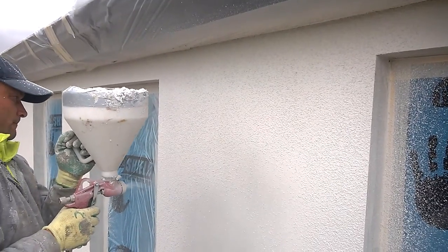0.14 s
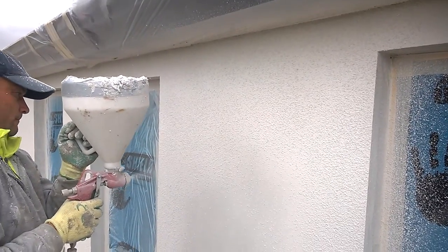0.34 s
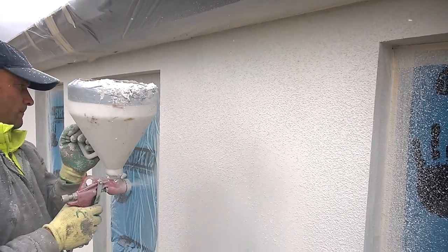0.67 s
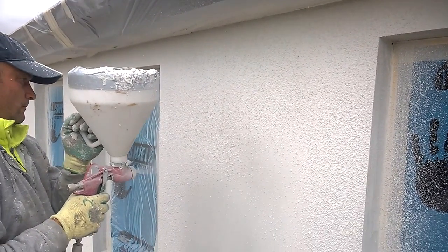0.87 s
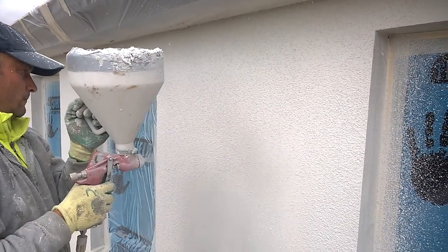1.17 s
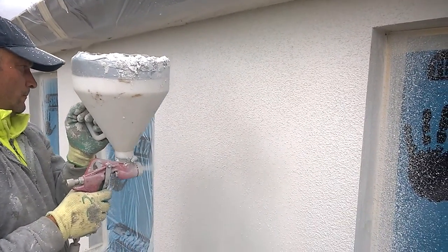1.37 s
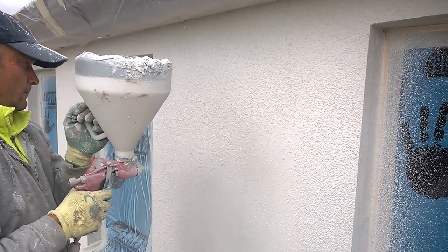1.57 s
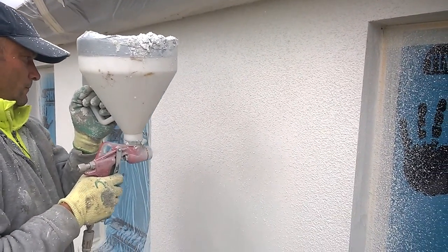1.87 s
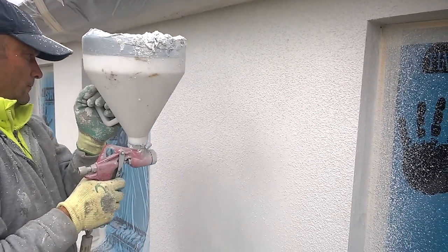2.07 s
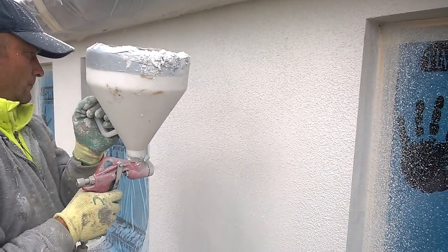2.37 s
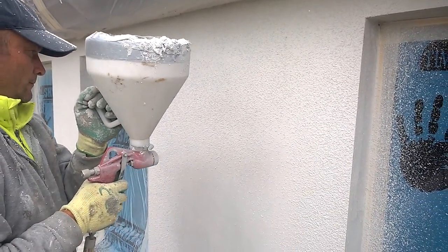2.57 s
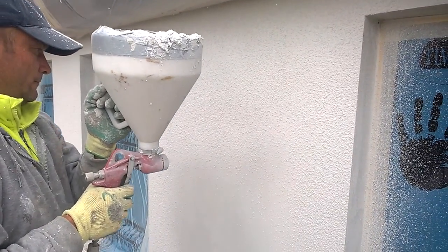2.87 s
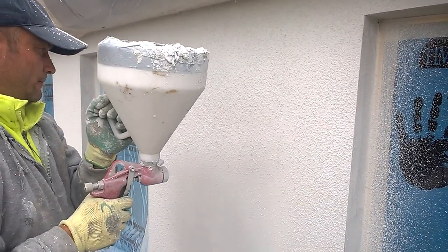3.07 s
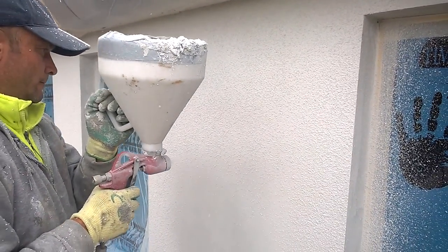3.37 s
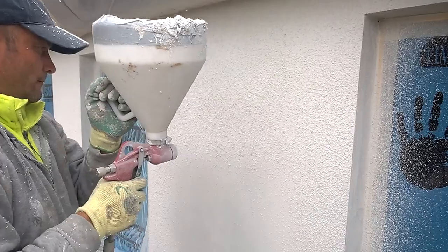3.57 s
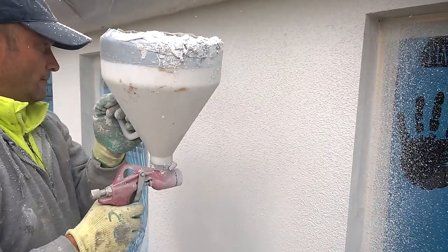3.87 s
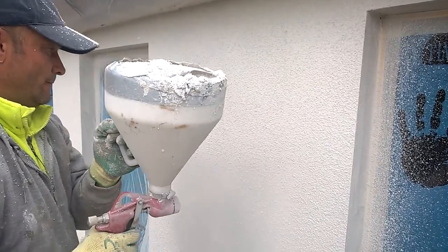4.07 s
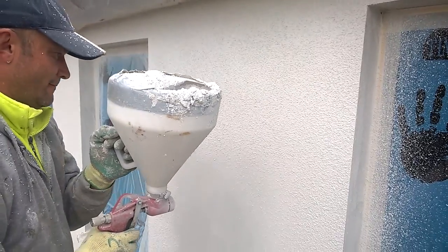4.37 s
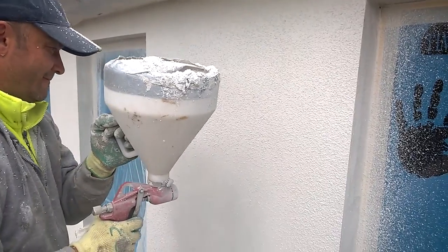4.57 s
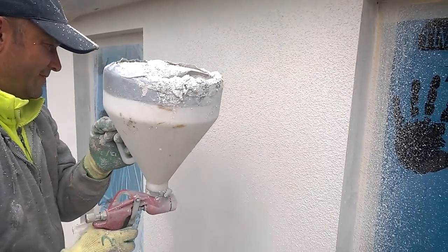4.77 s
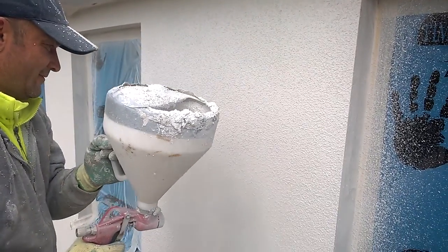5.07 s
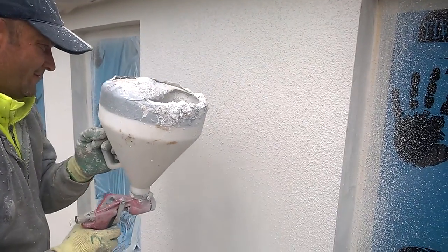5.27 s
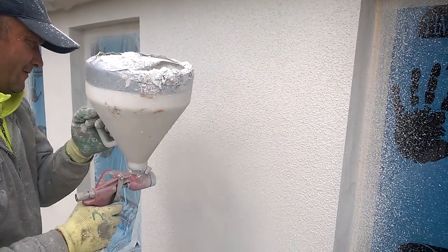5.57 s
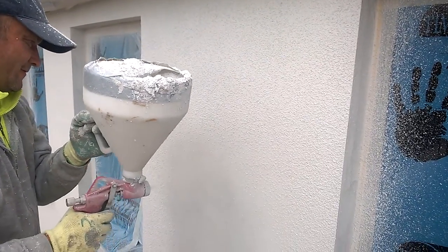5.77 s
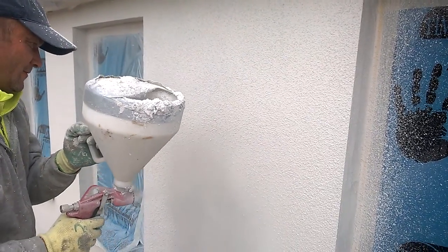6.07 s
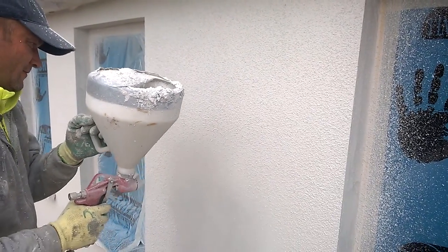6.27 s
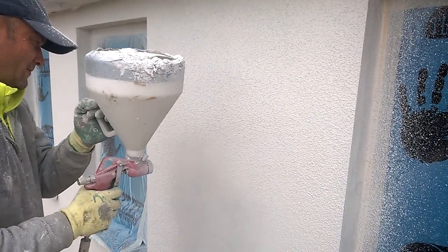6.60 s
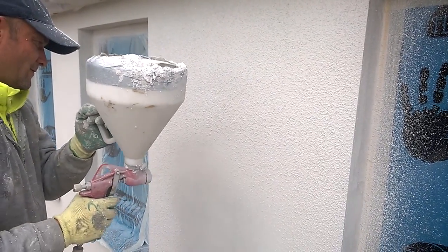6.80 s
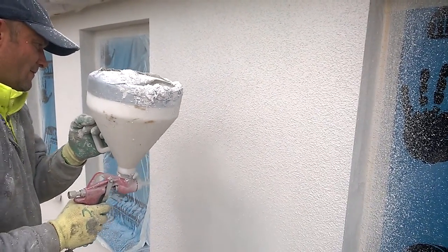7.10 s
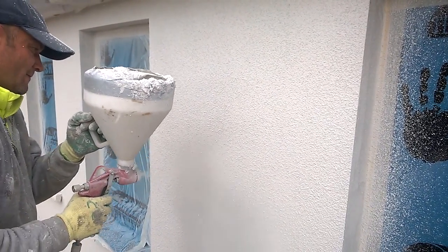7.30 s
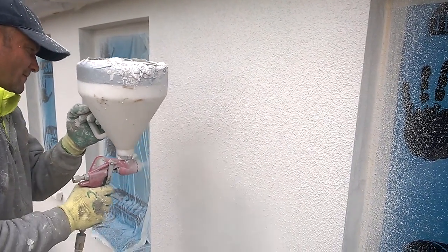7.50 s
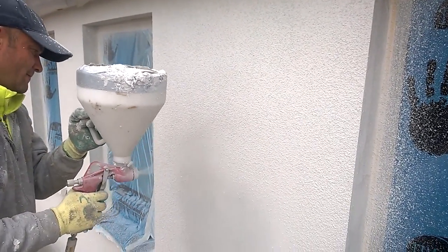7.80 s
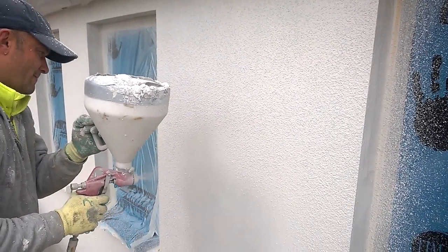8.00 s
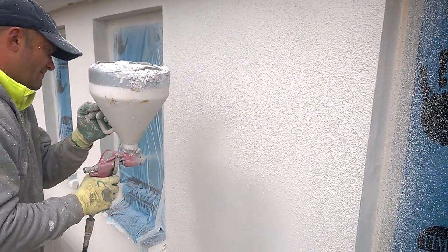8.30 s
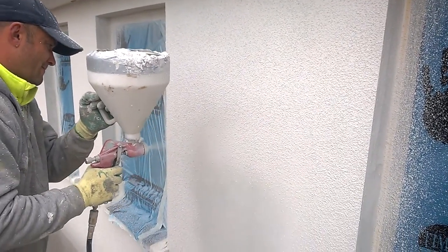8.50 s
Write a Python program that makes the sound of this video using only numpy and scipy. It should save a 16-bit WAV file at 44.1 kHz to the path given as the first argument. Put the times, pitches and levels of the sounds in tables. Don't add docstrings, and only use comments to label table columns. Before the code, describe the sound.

A compressed-air spray gun hisses steadily and sharply at a wall, swaying in circles, while faint wet plaster blobs patter over a low site rumble.

```python
import sys
import numpy as np
from scipy import signal
from scipy.fft import rfft, irfft, next_fast_len
from scipy.io import wavfile
from scipy.ndimage import uniform_filter1d, minimum_filter1d, map_coordinates

SR = 44100
rng = np.random.default_rng(int(sys.argv[2]) if len(sys.argv) > 2 else 0)


def wav_out(sig):
    wavfile.write(sys.argv[1], SR, np.round(np.clip(np.atleast_2d(sig).T, -1, 1) * 32767).astype(np.int16))


def boost(x):
    u = np.asarray(x, float) / 20
    return 10 ** u


N = 381465


def unit(x):
    return x / np.sqrt(np.mean(x ** 2) + 1e-20)


def along(points, hz, index=1):
    rows = np.array(points)
    return np.interp(np.log(hz + 1), np.log(rows[:, 0] + 1), rows[:, index])


def wobble(rate_hz):
    knots = rng.standard_normal(int(N * rate_hz / SR) + 4)
    return map_coordinates(knots, [np.arange(N) * rate_hz / SR])


def blurred(x, size_hz, size_t):
    return uniform_filter1d(uniform_filter1d(x, size=size_hz, axis=0), size=size_t, axis=1)


def filtered(x, response):
    m = next_fast_len(N + 8192)
    return irfft(rfft(x, m) * response(np.fft.rfftfreq(m, 1 / SR)), m)[..., :N]


def delayed(x, late_ms):
    return map_coordinates(x, [np.arange(N) - late_ms * SR / 1000], order=3)


def patchy(patchy_db, gain_db):
    hz, t, z = signal.stft(rng.standard_normal(N), SR, nperseg=1024, noverlap=768)
    streaks = unit(blurred(rng.standard_normal(z.shape), 4, 12))
    z = z * boost(patchy_db * streaks + gain_db(hz, t))
    return signal.istft(z, SR, nperseg=1024, noverlap=768)[1][:N]


# (frequency [Hz], density [dB per Hz])
NOZZLE = [(2120, -47), (3600, -25), (4020, -26.5), (5110, -14), (5530, -15.5), (6370, -3), (7030, 1.5),
          (8870, -5.5), (11800, -1), (13500, -7), (15100, -8), (15600, -19)]


def jet_air():
    flat_hz = 15050
    air = filtered(patchy(1.56, beam_db), lambda hz: boost(along(NOZZLE, np.minimum(hz, flat_hz))))
    slow_db = 0.33 * wobble(9) + 0.086 * wobble(22)
    fast_db = 0.33 * wobble(70) + 0.42 * wobble(160) + 0.8 * wobble(600)
    return unit(air) * boost(slow_db + fast_db)


# (time [s], aim at microphone [dB], lift [dB])
AIM = [(0, -4.5, 0.1), (1.2, -4, -0.2), (1.45, 0, -0.7), (1.72, -3.5, -0.2), (2.2, 0.8, -.6),
       (2.65, 1.3, -.6), (3.05, 5.5, 0.3), (3.45, 1.5, 0.5), (3.78, 4.2, 0.7), (4.05, 1, -0.3),
       (4.5, 5, 1.3), (5.38, 2.2, 0.2), (6.0, 4.5, -0.4), (6.4, -0.5, .1), (6.78, 1.5, -.3), (7.0, 3, -1),
       (7.35, -4, 0.2), (8.65, -5.5, 0.1)]
# (frequency [Hz], share [1])
FOLLOW = [(4000, 1.6), (8000, 0.83), (11800, 0.48), (13300, 0.43), (15500, 0.55)]
# (centre [Hz], half width [Hz], gain per aim [dB/dB])
LOBES = [(4940, 480, 1.1), (10240, 970, .65), (14000, 800, 0.5)]
# (frequency [Hz], share [1])
LIFT = [(6000, -.9), (8500, .1), (11000, .9), (15000, 0.4)]


def beam_db(hz, t):
    s, aim, lift = np.transpose(AIM)
    aim_db, lift_db = np.interp(t, s, aim), np.interp(t, s, lift)
    broad_share = 0.35
    gain_db = along(FOLLOW, hz)[:, None] * broad_share * aim_db
    for centre_hz, half_width_hz, share in LOBES:
        inside = np.exp(-((hz - centre_hz) / half_width_hz) ** 4)[:, None]
        gain_db = gain_db + inside * (share * aim_db - gain_db)
    return gain_db + along(LIFT, hz)[:, None] * lift_db


# (frequency [Hz], echo level [dB], phase [turns])
WALL_COLOUR = [(5000, -30, -.15), (5900, -13, -.1), (6600, -9, 0), (7900, -10, 0), (8600, -17, -.1),
               (9400, -17, -.36), (10700, -22, -.2), (11600, -21, .08), (12700, -17, .03),
               (14100, -18, -.25), (15000, -18, -.4)]


def wall_echo(air):
    def reflection(hz):
        turns = along(WALL_COLOUR, hz, index=2)
        return boost(along(WALL_COLOUR, hz)) * np.exp(2j * np.pi * turns)
    return delayed(filtered(air, reflection), circling_ms())


# (far end [s], delay [ms], near end [s], delay [ms])
CIRCLES = [(-.1, 1.58, .3, 1.465), (.68, 1.56, .98, 1.521), (1.49, 1.623, 1.8, 1.569),
           (2.33, 1.67, 2.62, 1.627), (3.11, 1.73, 3.49, 1.643), (4.05, 1.834, 4.57, 1.669),
           (4.95, 1.768, 5.51, 1.54), (5.92, 1.682, 6.51, 1.476), (6.93, 1.61, 7.51, 1.377),
           (7.9, 1.486, 8.44, 1.301), (8.85, 1.42, 9.4, 1.3)]


def circling_ms():
    s, late_ms = np.reshape(CIRCLES, (-1, 2)).T
    place = np.interp(np.arange(N) / SR, s, np.arange(len(s)))
    end = place.astype(int)
    swing = np.sin(np.pi / 2 * (place - end)) ** 2
    return late_ms[end] + (late_ms[end + 1] - late_ms[end]) * swing


# (delay [ms], drift [ms], level [dB])
BOUNCES = [(.62, .03, -21), (.95, .03, -18), (2.3, .05, -16), (3.4, .06, -15), (4.7, .07, -16)]


def near_bounces(air):
    upper = filtered(air, lambda hz: boost(-3.8) / (1 + (8500 / (hz + 1)) ** 12))
    return sum(boost(db) * delayed(upper, ms + drift_ms * wobble(1.7)) for ms, drift_ms, db in BOUNCES)


def jet():
    air = jet_air()
    return unit(air + wall_echo(air) + near_bounces(air)) * boost(-47.5)


def splats(times_s, level_db, hz, cycles):
    t = np.arange(500) / SR
    age = hz[:, None] * t / cycles
    envelope = np.e * age * np.exp(-age)
    waves = boost(level_db)[:, None] * np.sin(2 * np.pi * hz[:, None] * t) * envelope
    at = (times_s * SR).astype(int)[:, None] + np.arange(len(t))
    return np.bincount(at.ravel(), waves.ravel(), N + len(t))[:N]


# (time [s], peak level [dB], frequency [Hz])
BLOBS = [(0.207, -64, 751), (0.849, -63, 501), (1.485, -67, 923), (1.807, -74, 1340), (2.117, -65, 826),
         (3.05, -73, 603), (3.399, -64.5, 735), (3.538, -72, 708), (4.046, -64, 791), (4.681, -62, 735),
         (5.329, -62, 685), (5.971, -63.5, 886), (6.612, -67, 985), (7.252, -66, 931), (7.877, -63, 830),
         (8.325, -72, 678), (8.519, -65, 720), (8.557, -70, 689)]


def plaster(count=500):
    s, db, hz = np.transpose(BLOBS)
    draw = rng.random((count, 3))
    small_db, small_hz = -84 + 11 * draw[:, 1], 500 * boost(11.6 * draw[:, 2])
    small = splats(draw[:, 0] * N / SR, small_db, small_hz, cycles=0.63)
    body = splats(s, db - 1.5, hz, cycles=0.62)
    slap = splats(s + 0.0013, db - 2, 1.76 * hz, cycles=0.57)
    return small + body + slap


def gusts_db(hz, t):
    return 0.92 * unit(blurred(rng.standard_normal((len(hz), len(t))), 14, 14))


# (frequency [Hz], density [dB per Hz])
SITE = [(12, -35), (20, 5), (43, -0.5), (297, -12), (1460, -21), (2000, -18), (2450, -21), (3000, -15),
        (4020, -25.5), (4300, -17.5), (5590, -54), (9460, -120)]


def site():
    rumble = filtered(patchy(1.77, gusts_db), lambda hz: boost(along(SITE, hz)))
    level_db = -71.1 + 0.55 * wobble(6) + 0.35 * wobble(18)
    return boost(level_db) * unit(rumble)


# (time [s], centre [Hz], level [dB])
SPOTS = [(1.556, 5200, -80), (1.556, 13100, -62), (2.421, 13800, -66), (2.682, 10300, -61),
         (2.839, 9700, -58), (2.839, 14800, -64), (3.123, 11000, -54), (3.419, 5200, -73),
         (5.526, 5200, -69), (5.579, 11700, -59), (6.78, 9650, -60), (6.78, 15100, -69),
         (8.197, 13800, -66), (8.295, 6000, -66)]


def spots():
    side, width, band_hz = np.zeros(N), 2048, 1450
    hz = np.fft.rfftfreq(width, 1 / SR)
    fade = np.sin(np.pi * np.arange(width) / width)
    for s, centre_hz, db in SPOTS:
        inside = abs(hz - centre_hz) < band_hz / 2
        band = irfft(rfft(rng.standard_normal(width)) * inside)
        start = round(s * SR) - width // 2
        side[start:start + width] += boost(db - 0.5) * unit(band) * fade
    return side


def scene():
    return np.tile(jet() + plaster() + site(), (2, 1))


# (frequency [Hz], level re neighbourhood [dB])
DROP = [(300, -12), (1000, -6.2), (1800, -5.8), (2450, -3.9), (3000, -6.5), (4200, -5), (5800, -7.6),
        (7000, -12)]


def silence_weak_cells(x):
    hz, _, z = signal.stft(x, SR, nperseg=2048, noverlap=1536)
    power = np.abs(z) ** 2 + 1e-20
    cell, around = blurred(power, 6, 3), blurred(power, 30, 5)
    margin_db = 10 * np.log10(np.abs(cell / around)) - along(DROP, hz)[:, None]
    margin_db = minimum_filter1d(minimum_filter1d(margin_db, size=3, axis=0), size=3, axis=1)
    keep = 1 / (1 + boost(-40 * np.clip(margin_db, -2, 2)))
    return signal.istft(z * keep, SR, nperseg=2048, noverlap=1536)[1][:N]


def roll_off(x):
    return signal.sosfilt(signal.butter(12, 16510, fs=SR, output="sos"), x)


def record(dry):
    mid = silence_weak_cells(filtered(dry[0], lambda hz: hz < 15750))
    side = spots()
    return roll_off(np.array([mid + side, mid - side]))


dry = scene()
out = record(dry)
wav_out(out)
```